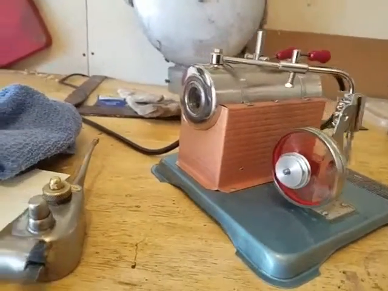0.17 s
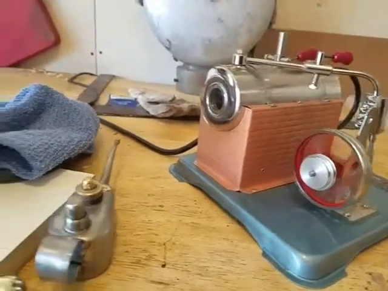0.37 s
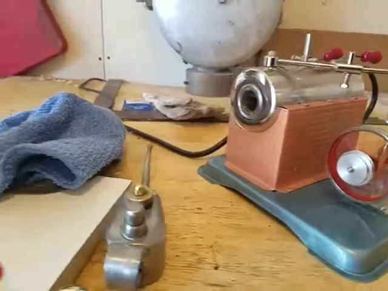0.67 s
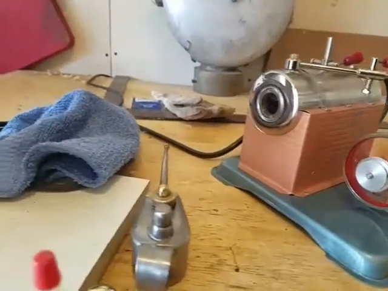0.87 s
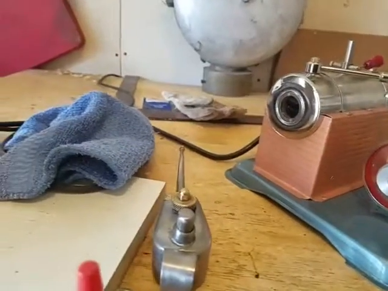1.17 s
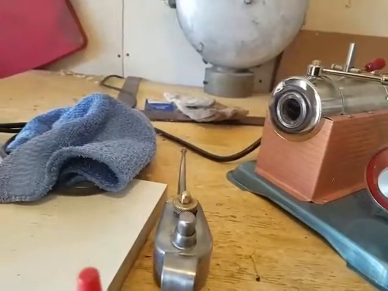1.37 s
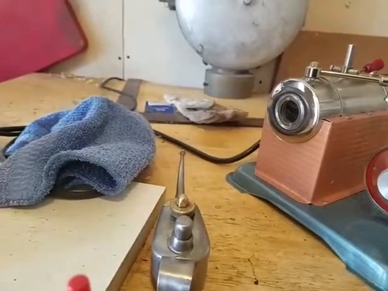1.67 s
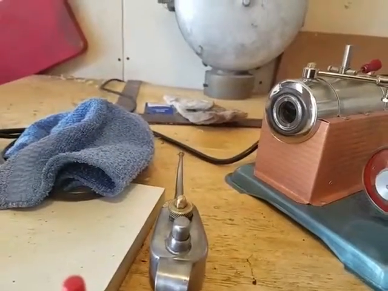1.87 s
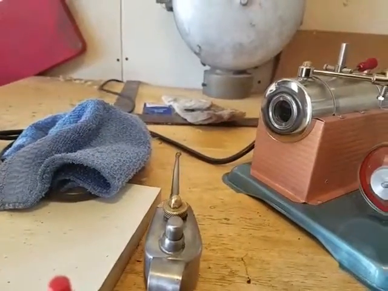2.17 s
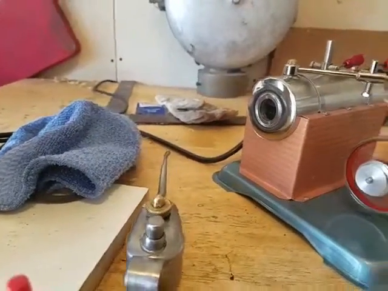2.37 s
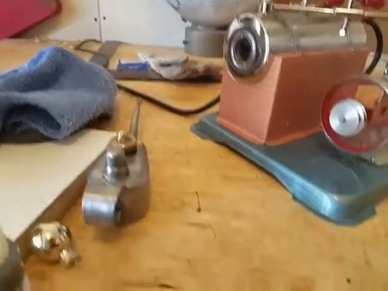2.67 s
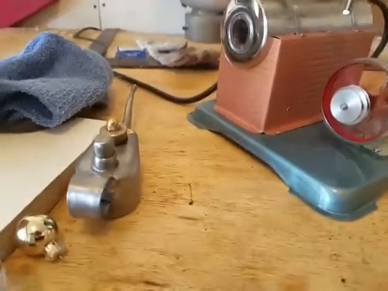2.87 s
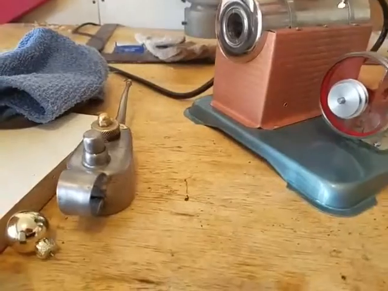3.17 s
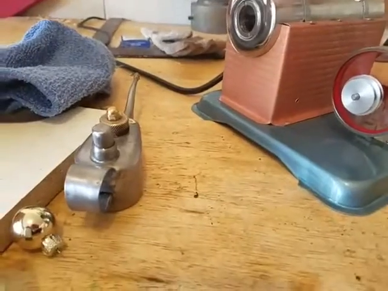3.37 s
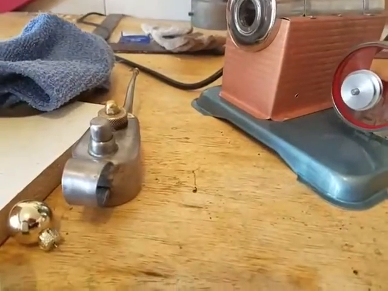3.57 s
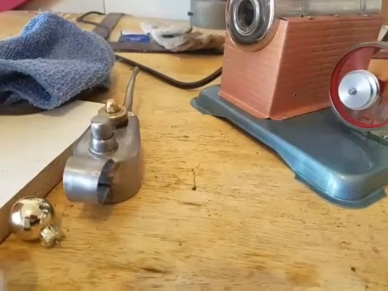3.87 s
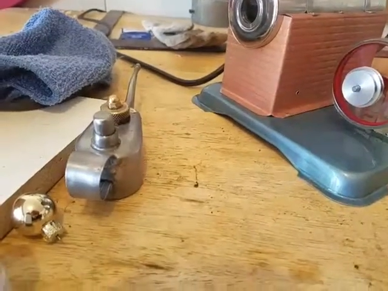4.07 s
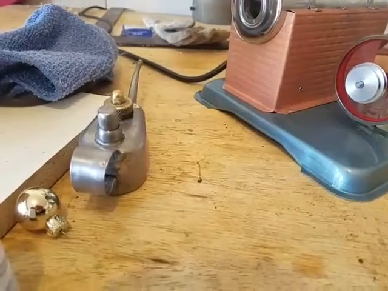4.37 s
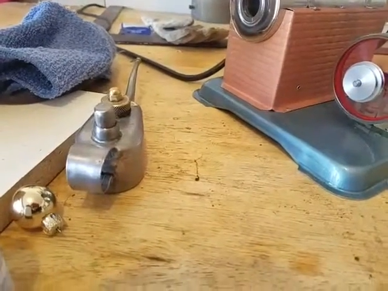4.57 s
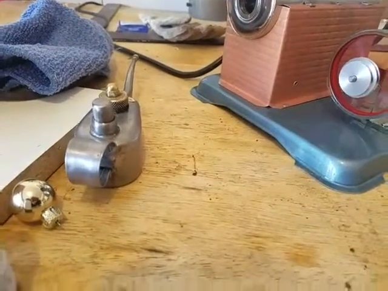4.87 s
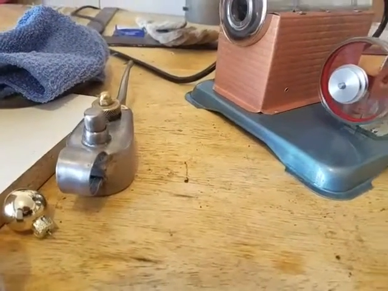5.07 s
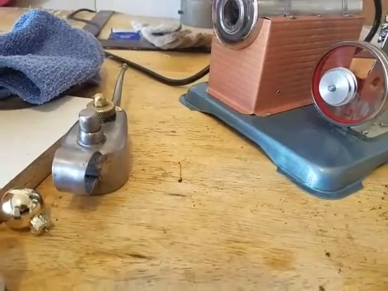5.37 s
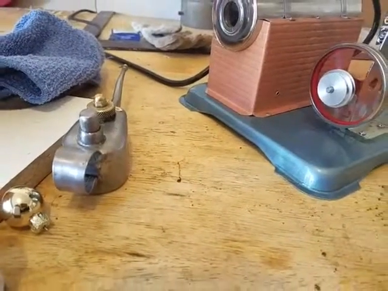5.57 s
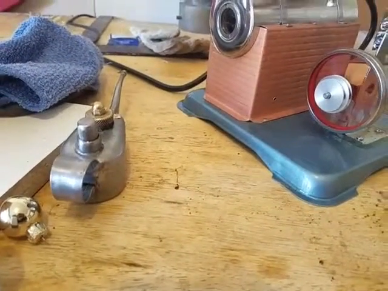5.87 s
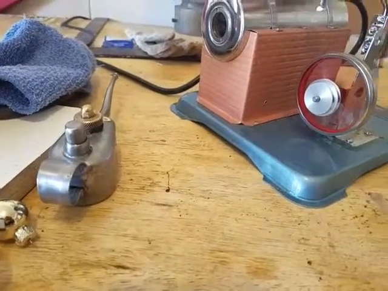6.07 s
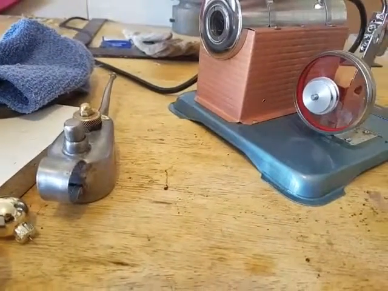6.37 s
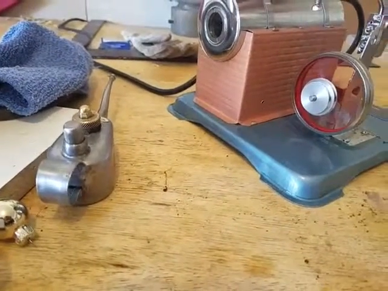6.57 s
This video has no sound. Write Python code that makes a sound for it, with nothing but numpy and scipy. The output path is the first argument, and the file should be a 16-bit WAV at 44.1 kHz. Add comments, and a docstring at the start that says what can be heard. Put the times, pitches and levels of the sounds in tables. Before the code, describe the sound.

From 0 s a toy steam engine is already running on a wooden bench, about fifteen turns a second and almost perfectly steady. Each turn gives a dull tinny linkage knock, a soft chuff with a bright, thin spit of steam, and a little bearing grind, merging into a fast rattling purr. Faint bumps and rubs pass around 2.4-3 s; light hand knocks come from 4.1 to 4.7 s. At about 4.57 s a valve spits open and a piercing whistle chirps upward to roughly 5.6 kHz, holding with slight flutter and hiss, shifting between the sides, while the engine drops back. Near 5.95 s it roughens and leaps higher, breaking around 6.1 s into broad hissing steam with sharp splutters, brief squeals and low buffets, mostly left, until the end at about 6.7 s. Close stereo microphones, a small room's short tail, quiet background noise.

```python
"""Toy steam engine and whistle.

The engine runs at about fifteen turns a second: noise puffs for the exhaust, struck modes for the loose
linkage knocking on the tin base, looped grinding noise for the bearing. A hand opens the boiler whistle, a
roughened sine with an octave, which chirps, sings, overblows and breaks into shaped noise and sharp
spluttering pulses. Faint workshop noise lies beneath. The recorder's gain control pushes the engine back
under the whistle.
"""
import sys
import numpy as np
from scipy import signal
from scipy.fft import rfft, irfft
from scipy.io import wavfile
from scipy.ndimage import uniform_filter1d, map_coordinates

SR = 44100
rng = np.random.default_rng(int(sys.argv[2]) if len(sys.argv) > 2 else 0)


def unload_wav(signal):
    """Save mono or channel-first audio to the path in sys.argv[1] as 16-bit WAV at rate SR, clipped to [-1, 1]."""
    wavfile.write(
        sys.argv[1],
        SR,
        np.round(np.clip(np.atleast_2d(signal).T, -1, 1) * 32767).astype(np.int16),
    )


N = 296352
TIME_S = np.arange(N) / SR

# flywheel speed: start_s, turns_per_s
FLYWHEEL_SPEED = [(0, 14.686), (1.4, 14.718), (2.1, 14.841), (4.5, 14.819)]
# level offsets of the engine's parts; the chuff sinks as the whistle bleeds off pressure:
# start_s, hiss_db, chuff_db, knock_db, base_db
ENGINE_LEVELS = [(0, 0.5, 0.5, 3, 1.5), (.5, 2, 1, 4, 0.5), (.9, 1, 1.5, 0.5, 0.5), (1.25, 2, 1, 1, 0.5),
                 (1.851, 3, 3.5, -1, 0), (2.6, 0, 1, 2, 0.5), (3.2, 3, 2.5, 1, 1.5),
                 (3.5, -0.5, 1.5, -2, 0), (3.9, 1.5, 1.5, -1.5, 1), (3.98, 2.5, 2, 1, 0.5),
                 (4.27, 0.5, 0, -3, -0.5), (4.5, 2, -4, 1, -0.5), (4.8, 2, -7.5, -2, 0),
                 (5.3, -5, -10, -3, 0.5), (6.72, 1, -4, -3, -4)]
# scatter from stroke to stroke: hiss_db, chuff_db, knock_db
STROKE_SCATTER_DB = [1.2, 1, 0.9]
# linkage contacts in every turn: after_stroke_s, strength_db, best_driven_hz
LINKAGE_CONTACTS = [(-0.01196, -4, 199), (-0.00475, 2, 2300), (0.00448, 8, 1480), (0.00909, 4, 640),
                    (0.0113, -2, 835), (0.0176, -6.5, 347), (0.0272, -6, 572), (0.0299, 15.5, 25),
                    (0.0384, -8, 1836), (0.04591, -8.5, 550), (0.0547, -10, 340)]
# modes of bench top, tin base and firebox: mode_hz, level_db, t60_s
BASE_MODES = [(74.6, -46.5, 0.15), (107.8, -45, 0.37), (128.6, -34.5, 0.19), (151.7, -40.5, 0.18),
              (180.2, -39, 0.37), (216, -40, 0.32), (244.4, -46, 0.18), (280.3, -32.5, 0.06),
              (352.1, -40.5, 0.23), (399.2, -44.5, 0.23), (427.2, -39.5, 0.15), (467.5, -37.5, 0.11),
              (507.5, -38, 0.1), (594, -44.5, 0.27), (628.2, -38, 0.12), (675.5, -44.5, 0.13),
              (729.7, -40, 0.22), (752, -45.5, 0.29), (781.7, -31, 0.17), (872.5, -42.5, 0.13),
              (932, -36, 0.03), (1079, -45, 0.15), (1197.3, -37.5, 0.011), (1234.5, -23.5, 0.06),
              (1337.7, -32.5, 0.039), (1426.5, -36.5, 0.044)]
# bearing grind colour, heard through the bench: point_hz, relative_db_per_hz, left_right_db
BEARING_COLOUR = [(197, -6, -8), (412, -3, 0), (540, 4, 14), (740, -11, -19), (910, 0, -11),
                  (1540, 2.5, 27), (1700, -40, 2), (4000, -50, 0)]
# exhaust steam colour: point_hz, relative_db_per_hz, left_right_db
PUFF_COLOUR = [(1750, -7, 10), (2075, -2.5, 3), (2330, -15, -6), (3130, -6, -0.5), (3580, -12.5, 0.5),
               (4470, -11, -0.5), (5270, -12, -1), (6360, -17, 0), (7800, -14, -1), (8800, -11.5, 0),
               (9600, -13.5, -6), (11600, -10.5, -2), (12700, -8.5, 4), (13500, -3, 3), (15360, -1, 0)]
# exhaust hiss peaks, shifting as the microphones move about the engine:
# start_s, upper_hz, upper_db, lower_hz, lower_db
HISS_PEAKS = [(0, 14300, -7, 12600, -12.5), (.5, 13970, -3, 12600, -8), (1, 13660, -2.5, 11930, -13),
              (2.25, 13450, -2.5, 11900, -16), (2.6, 13670, -0.5, 11200, -8.5), (3, 14000, -5, 11390, -8.5),
              (3.4, 14250, 1.5, 11180, -6.5), (3.9, 14300, 0.5, 11320, -6.5), (4.5, 14470, 0.5, 11500, -7)]
# modes of cylinder and steam pipe, ticked as the port opens: mode_hz, level_db, t60_s
PIPE_MODES = [(2026, -39, 0.042), (2125, -45, 0.06), (2850, -39.5, 0.06), (3270, -59, 0.064),
              (4380, -43, 0.086), (4750, -37, 0.044)]
# whistle note, following boiler pressure: start_s, pitch_hz
WHISTLE_NOTE = [(4.635, 5776), (4.649, 5720), (4.861, 5595), (4.893, 5653), (5.101, 5576), (5.129, 5644),
                (5.715, 5533), (5.835, 5603), (5.925, 5552)]
# valve pushed wide, tone overblows and breaks: start_s, pitch_rise_hz, level_change_db, added_roughness_0_1
OVERBLOW = [(5.932, -1.5, 0, 0.01), (5.965, 401, -0.5, 0.58), (6.005, 897, -2, 0.6), (6.025, 996, 2, 0.25),
            (6.08, 984, 1, 0.14), (6.1, 1232, 0, .4), (6.12, 1650, -3, 0.47), (6.135, 1551, -15, 0.73),
            (6.21, 1498, -16, 0.8), (6.32, 1650, -45, 0.62)]
# standing waves at the two microphones: start_s, level_db, left_right_db, left_right_phase_rad
STANDING_WAVES = [(4.58, 8.5, -6, 2.6), (4.592, -1, 4, -3.5), (4.652, 0, 1.0, -3), (4.716, 2, 2, -2.5),
                  (4.748, 0, 5, -3), (4.78, -2, 11.5, -1), (4.792, 4.5, -1, -1.4), (4.88, 3.5, -11, 0.4),
                  (4.9, -0.5, 4.0, -1.5), (4.94, 2.5, 0, -0.6), (5.028, 0.5, 7.5, -1), (5.084, 1, 7, -1.1),
                  (5.124, 1.5, 4, 2), (5.176, -0.5, -0.5, -1.3), (5.264, 1, -2, -0.5),
                  (5.388, 0.5, -2, -1.1), (5.428, -1.5, 6, -1.1), (5.496, 2.5, 1, -1.25),
                  (5.54, 0, 3.5, -1.3), (5.576, 1.0, 0, -1), (5.604, 0.5, 4.5, 1.5),
                  (5.656, 1.5, -7.5, -2.3), (5.72, -1, -3, 0.4), (5.768, 1, 5.0, -0.8),
                  (5.852, 2, -1, -1.8), (5.908, -1.5, 4, 0.5), (5.936, 2.0, 0.5, -2), (5.968, 0.0, 2, -3),
                  (5.972, -3.5, 2, -7), (6.008, 0, -5, -8.5), (6.02, 0.5, 2, -12.5), (6.04, -2, 3, -9.5),
                  (6.06, 0.5, 3, -12), (6.096, 0, 3.5, -12)]
# steam through the valve: start_s, leak_hiss_db, overblown_jet_db, microphone_draught_db
VALVE_STEAM = [(4.545, -43, -76.5, -73), (4.57, -21.5, -82, -43), (4.75, -16, -80, -37.5),
               (5.3, -18, -82, -48.5), (5.9, -16, -61, -41.5), (6.0, -15, -25, -31),
               (6.12, -12.5, -25, -32.5), (6.25, -19, -16, -36), (6.35, -33, -13, -29),
               (6.72, -15.5, -12.5, -32)]
# hiss colour beside the tone: point_hz, relative_db_per_hz, left_right_db
LEAK_COLOUR = [(1730, -18.5, 1.5), (2980, -13, -1), (4420, -12, -0.5), (6700, -10.5, -1), (7450, -8.5, 7),
               (7650, -9.5, -2), (7900, -11, -5), (8350, -4.5, 3), (9000, -11.5, -3), (9600, -15, -6),
               (10600, -11.5, -5), (11400, -7.5, -2), (12100, -9, -5), (13000, -6, -1), (13600, -6, 0.7),
               (14200, -4, 4.0), (15200, 0.0, 8.7), (16200, -1, 4)]
# overblown jet colour: point_hz, relative_db_per_hz, left_right_db
JET_COLOUR = [(1991, -20, 6), (3900, -21.5, 2), (5460, -17, 2.4), (6250, -22, -0.1), (6600, -13, 10),
              (6930, -4, -1), (7660, 0.5, -3.5), (7680, -3, 4), (7800, -9, 3), (8400, -4, 4.2),
              (8600, -12, -2), (9440, -10.5, 6), (9800, -20, 4), (10560, -8.5, -9.1), (11200, -17, -6),
              (11700, -10.5, -5.6), (12500, -12.5, -2.5), (13200, -11.2, -1), (14600, -10, 6),
              (14950, -12, 2), (15500, -1, 9), (15750, -8, 9.8)]
# draught buffeting the microphones: point_hz, relative_db_per_hz, left_right_db
BUFFET_COLOUR = [(44.7, -21, 17), (131, -0.5, 4), (184, -6, 16), (340, -3.5, 3.5), (700, -11, 25),
                 (2000, -21, 5)]
# short bursts at the valve's opening and as the tone breaks: spits, thin squeals and gusts:
# start_s, length_s, level_db, centre_hz, relative_width
STEAM_BURSTS = [(4.558, 0.012, -28.5, 5640, .07), (4.574, 0.033, -20, 5220, 0.092),
                (6.072, 0.027, -23.5, 1682, 0.41), (6.095, 0.018, -19, 252, 0.76),
                (6.104, 0.019, -17.5, 1430, 0.79), (6.12, 0.074, -20.5, 1910, 1.2),
                (6.13, 0.06, -22, 3080, 0.13), (6.135, 0.054, -18, 8550, 0.012),
                (6.222, 0.023, -22, 2070, 0.78), (6.248, 0.031, -21, 9060, .02),
                (6.25, 0.02, -23, 2100, .75), (6.316, 0.066, -20.5, 750, 2.3), (6.39, 0.033, -24, 483, 2.2),
                (6.458, 0.072, -28, 700, 2.9), (6.57, 0.018, -25.5, 249, 1.2)]
# sharp spluttering pulses of the jet, many of them buffets at the left microphone:
# start_s, peak_db, pitch_hz, left_right_db
JET_PULSES = [(6.106, -8.5, 420, -5), (6.117, -11, 1500, 8), (6.169, -11, 2600, 6), (6.227, -15, 2900, 12),
              (6.238, -12, 1800, 3), (6.255, -13, 1300, 11), (6.267, -6, 1700, 9), (6.3, -10, 400, 18),
              (6.318, -13, 484, 18), (6.328, -14, 330, 18), (6.343, -14, 400, 15), (6.351, -12, 600, 15),
              (6.364, -15, 500, 15), (6.373, -11, 350, 19), (6.393, -16, 315, 15), (6.411, -13, 600, 19),
              (6.461, -13, 550, 15), (6.483, -13, 450, 15), (6.499, -11, 1200, 9), (6.577, -15, 281.4, 15)]
# bumps, rubs and a low swell of draught: start_s, length_s, level_db, centre_hz, relative_width
BUMPS_AND_SWELL = [(2.42, 0.11, -42.5, 266.4, 0.65), (2.47, 0.12, -44, 1820, 0.11),
                   (2.53, 0.2, -44, 1620, 0.064), (2.68, 0.3, -50, 1560, 0.078), (2.7, 0.18, -47, 71, 0.43),
                   (4.13, 0.34, -40.5, 420, 0.89), (4.335, 0.038, -47, 365, 0.45),
                   (4.45, 0.042, -40, 882, 0.23), (4.684, 0.016, -31, 1400, 0.68),
                   (4.69, 0.046, -29, 140, 0.57), (5.36, 0.42, -42, 130, 0.23), (6.097, 0.048, -33, 109, 1),
                   (6.445, 0.037, -37, 150, 0.52)]
# knocks of the hand against the engine: start_s, strength_db, best_driven_hz
HAND_KNOCKS = [(4.1875, -16, 900), (4.199, -21, 750), (4.231, -24, 220), (4.326, -21, 800),
               (4.528, -22.5, 850), (4.474, -28, 850), (4.687, -12.5, 240), (4.705, -16, 130)]
# modes rung by those knocks: mode_hz, level_db, t60_s
KNOCK_MODES = [(133, -2, 0.076), (212.2, -5, 0.046), (397, -5, .04), (592, -9, 0.06), (862.5, 1.5, .055),
               (975, -4, .03), (1130, -6, 0.036), (1900, -21, 0.018)]
# workshop background colour: point_hz, relative_db_per_hz, left_right_db
FLOOR_COLOUR = [(25, -36, 0), (60, -15, 2), (110, -3, 0), (164, -6, 2), (260, -2, 4), (400, 7.5, -6),
                (600, 2, 11), (1250, -1, -2), (1990, -4.5, 6), (3140, -6, 2), (6260, -27, 0),
                (10000, -42, 3), (15000, -40, 2)]

FIRST_STROKE_S, TURN_JITTER_S = .047, .00014
CONTACT_SCATTER_DB, CONTACT_SCATTER_S = .7, .00002   # dB scatter is x1.5 away from the knock modes
FRESH_GRIT_DB, BEARING_SWELL_S = -9, .021   # grit that is new in each turn
OPEN_S, ATTACK_S, WHISTLE_DB, SAG_DB_PER_S = 4.567, .025, -1.5, .85   # sag: boiler loses pressure
CHIRP_HZ, CHIRP_S = 1650, .011   # starts this flat, rises as steam replaces the air in the pipe
DRY_ROUGHNESS, WET_ROUGHNESS, DRYING_S = .14, .12, .17   # condensed water at the start is blown out
OCTAVE_DB, OCTAVE_GROWTH_DB, OCTAVE_SAG_DB_PER_S = -31, 23, 6   # growth: at full overblow
OCTAVE_BLUR_HZ, OCTAVE_ROUGHNESS = 90, 1   # smear by the turbulent jet
ROOM_DB, ROOM_T60_S = -14.5, .38
FLOOR_DB = -48.5
CEILING, CUTOFF_HZ = .82, 15650


def turns():
    """One stroke per flywheel turn, each a little different: time_s, hiss_db, chuff_db, knock_db."""
    angle = np.cumsum(in_time(FLYWHEEL_SPEED)[0]) / SR
    first_turn = np.interp(FIRST_STROKE_S, TIME_S, angle)
    times = np.interp(np.arange(first_turn, angle[-1]), angle, TIME_S)
    times = np.append(2 * times[0] - times[1], times)   # already running at the start
    start_s, *levels_db, _ = np.transpose(ENGINE_LEVELS)
    usual = np.column_stack([times] + [np.interp(times, start_s, level) for level in levels_db])
    return (usual + rng.standard_normal(usual.shape) * [TURN_JITTER_S, *STROKE_SCATTER_DB]).T


def linkage(strokes, knock_hz=1250, knock_pan_db=7.0, body_pan_db=-3.0, spread_rad=0.15, level_db=-0.8,
            radiate_hz=68, contact_hz=1500, knock_rad=0.87, rise_s=0.0011, knock_rise_s=0.001327):
    """The same contacts recur every turn, each driving the base modes near its own pitch."""
    times, _, _, knock_db = strokes
    delay_s, strength_db, best_hz = np.transpose(LINKAGE_CONTACTS)
    at = times[:, None] + delay_s
    at = at + CONTACT_SCATTER_S * rng.standard_normal(at.shape)
    out = np.zeros((2, N))
    for k, (hz, mode_db, t60_s) in enumerate(BASE_MODES):
        # 0-1: how far this mode follows the force of the stroke
        knock_share = np.exp(-(np.log2(hz / knock_hz) / 0.1) ** 2)
        scatter_db = CONTACT_SCATTER_DB * (1.5 - .5 * knock_share) * rng.standard_normal(at.shape)
        size = from_db(mode_db + strength_db + knock_share * 1.05 * knock_db[:, None] + scatter_db)
        size = size / (1 + np.log2(hz / best_hz) ** 2)
        swell_s = rise_s + knock_share * knock_rise_s   # the sheet takes a moment to move
        force = clicks(at.ravel() - swell_s, size.ravel())
        resonance = signal.iirpeak(hz, .5 + np.pi * hz * swell_s, fs=SR)
        mode = signal.lfilter(*resonance, ring(force, hz, t60_s))
        # each mode meets the two microphones in its own phase
        lag_s = ((-1) ** k * spread_rad + knock_share * knock_rad) / (4 * np.pi * hz)
        pair = np.array([np.interp(TIME_S + d, TIME_S, mode) for d in (lag_s, -lag_s)])
        out += pair * panned(body_pan_db + knock_share * (knock_pan_db - body_pan_db))
    # oiled contacts are soft; a small base radiates no deep bass
    radiated = signal.butter(3, [radiate_hz, contact_hz], "band", fs=SR, output="sos")
    return from_db(level_db) * signal.sosfilt(radiated, out)


def exhaust(strokes, split_hz=6500, chuff_db=-24.5, hiss_db=-18.5, lead_s=0.0035, sputter_db=0.5):
    """The port opens with a soft chuff in the pipe's resonances, then a thin bright jet of steam."""
    times, stroke_hiss_db, stroke_chuff_db, _ = strokes
    times = times + 0.0011 * rng.standard_normal(len(times))
    below = signal.butter(4, split_hz, fs=SR, output="sos")
    above = signal.butter(4, split_hz, "high", fs=SR, output="sos")
    low = signal.sosfilt(below, noise(PUFF_COLOUR, direct=0.37, lag_ms=0.19))
    high = signal.sosfilt(above, noise(PUFF_COLOUR, direct=0.39, lag_ms=0.196))
    chuff = puffs(times - lead_s, stroke_chuff_db, rise_s=0.00069, fall_s=0.015,
                  echo_s=0.02, echo_db=-8.5, tail_db=-8.5, tail_s=0.041)
    hiss = puffs(times + 0.0005, stroke_hiss_db, rise_s=0.0014, fall_s=0.0036,
                 echo_s=0.021, echo_db=-16.0, tail_db=-20.0, tail_s=0.034)
    steam = from_db(chuff_db) * low * chuff + from_db(hiss_db) * hiss_colour(high) * hiss
    return steam * from_db(sputter_db * drift(780)[0])


def puffs(times, sizes_db, rise_s, fall_s, echo_s, echo_db, tail_db, tail_s):
    """Amplitude envelope of a puff train: burst, wall reflection and room tail, summed as power."""
    t = np.arange(-SR // 50, SR // 5) / SR

    def burst(u, decay_s):
        return np.exp(2 * np.minimum(u / rise_s, -u / decay_s))

    power = burst(t, fall_s)
    power = power + from_db(2 * echo_db) * burst((t - echo_s) / 2, fall_s)   # twice as long
    power = power + from_db(2 * tail_db) * burst(t, tail_s)
    train = signal.fftconvolve(clicks(times, from_db(2 * sizes_db)), power)[SR // 50:][:N]
    return np.sqrt(np.maximum(train, 0))


def hiss_colour(high):
    """Adds the jet's two moving peaks; patches of colour make the puffs unequally bright."""
    upper_hz, upper_db, lower_hz, lower_db = in_time(HISS_PEAKS)
    upper = from_db(upper_db) * gliding_band(upper_hz, 330) * panned(3.1)
    lower = from_db(lower_db) * gliding_band(lower_hz, 430) * panned(-2.5)
    return patchy(high + upper + lower, depth_db=4.0, patch_hz=798, patch_s=.06)


def port_tick(strokes, lead_s=.0035, scatter_db=1.0, scatter_s=.00032):
    """The rocking cylinder ticks against its port face as the port opens, ringing the pipe modes."""
    times, _, chuff_db, _ = strokes
    out = np.zeros((2, N))
    for hz, mode_db, t60_s in PIPE_MODES:
        for side in range(2):   # thin metal rings differently toward each microphone
            sizes = from_db(mode_db + chuff_db + scatter_db * rng.standard_normal(len(times)))
            at = times - lead_s + scatter_s * rng.standard_normal(len(times))
            out[side] += ring(clicks(at, sizes), hz, t60_s)
    return out


def bearing(strokes, level_db=-42, after_s=0.03):
    """Grinds over the same rough spots every turn, swelling mid-turn, sagging before the next puff."""
    times, _, _, knock_db = strokes
    t = np.arange(-SR // 16, SR // 16) / SR
    swell = np.exp(-.5 * (t / BEARING_SWELL_S) ** 2)
    grit = noise(BEARING_COLOUR, direct=0.85, lag_ms=0.054)
    train = clicks(times + after_s, from_db(0.082 * knock_db))
    one_turn = rms_one(grit[:, :len(t)]) * swell
    repeated = signal.fftconvolve(train[None], one_turn, axes=1)[:, len(t) // 2:][:, :N]
    fresh = grit * signal.fftconvolve(train, swell, "same")
    return from_db(level_db) * (repeated + from_db(FRESH_GRIT_DB) * fresh)


def blowing():
    """Whistle pitch_hz, strength and roughness: a rising chirp, a held note, then the overblow."""
    age_s = np.maximum(TIME_S - OPEN_S, 0)
    rise_hz, change_db, added_rough = in_time(OVERBLOW)
    hz = in_time(WHISTLE_NOTE)[0] - CHIRP_HZ * np.exp(-age_s / CHIRP_S) + rise_hz
    strength = from_db(WHISTLE_DB - SAG_DB_PER_S * age_s + change_db)
    strength = strength * np.minimum(age_s / ATTACK_S, 1) ** 2 * (TIME_S < OVERBLOW[-1][0])
    rough = DRY_ROUGHNESS + WET_ROUGHNESS * np.exp(-age_s / DRYING_S) + added_rough
    return hz, strength, np.clip(rough, 0, 1)


def whistle(flutter_hz=35, skirt_hz=260, skirt_db=-15, wander_hz=12):
    """Pipe tone and octave; droplets make it flutter, standing waves split it between microphones."""
    hz, strength, rough = blowing()
    standing_db, pan_db, apart_rad = in_time(STANDING_WAVES)
    phase = 2 * np.pi * np.cumsum(hz + wander_hz * drift(32.6)[0]) / SR
    flutter = complex_drift(flutter_hz) + from_db(skirt_db) * complex_drift(skirt_hz)
    wave = (np.sqrt(1 - rough ** 2) + rough * rms_one(flutter)) * np.exp(1j * phase)
    split = np.exp(1j * apart_rad * np.array([[.5], [-.5]]))
    tone = from_db(standing_db) * panned(pan_db) * wave * split
    rise_hz, age_s = in_time(OVERBLOW)[0], np.maximum(TIME_S - OPEN_S, 0)
    growth_db = OCTAVE_GROWTH_DB * np.sqrt(np.abs(rise_hz) / rise_hz.max())
    octave_db = OCTAVE_DB - OCTAVE_SAG_DB_PER_S * age_s + growth_db
    smear = rms_one(1 + OCTAVE_ROUGHNESS * complex_drift(OCTAVE_BLUR_HZ))
    octave = from_db(octave_db) * wave * wave * smear   # squaring doubles the pitch
    return np.sqrt(2) * strength * (tone + octave).real


def note_skirt(level_db=-35, half_width_hz=420):
    """Faint noise in a narrow band that follows the note."""
    hz, strength, _ = blowing()
    return from_db(level_db) * strength * gliding_band(hz, half_width_hz)


def valve_steam(flicker_db=1.0):
    """Hiss at the whistle's mouth, the broad jet left when the tone breaks, and its lumpy draught."""
    leak_db, jet_db, draught_db = in_time(VALVE_STEAM)
    leak = noise(LEAK_COLOUR, direct=0.089, lag_ms=0.094)
    leak = patchy(leak, depth_db=4.0, patch_hz=260.7, patch_s=.22)
    jet = noise(JET_COLOUR, direct=0.36, lag_ms=0.058)
    jet = patchy(jet, depth_db=3.0, patch_hz=259, patch_s=.09)
    steam = from_db(leak_db) * leak + from_db(jet_db) * jet
    draught = from_db(draught_db + 6.0 * drift(44)) * noise(BUFFET_COLOUR, direct=0.33, lag_ms=0.046)
    return steam * from_db(flicker_db * drift(35)) + draught


def jet_pulses(cycles=0.59, crack_db=-8, crack_s=0.00077, lowest_hz=130):
    """Sharp splutters: a tiny noise crack and a sine that dies within a few cycles."""
    out, age_s = np.zeros((2, N)), np.arange(SR // 40) / SR
    for start_s, peak_db, hz, pan_db in JET_PULSES:
        thump = np.sin(2 * np.pi * hz * age_s) * np.exp(-age_s * hz / cycles)
        dull_noise = signal.lfilter([.5], [1, -.7], rng.standard_normal(len(age_s)))
        crack = from_db(crack_db) * np.exp(-age_s / crack_s) * dull_noise
        a = int(start_s * SR)
        out[:, a:a + len(age_s)] += from_db(peak_db) * (thump + crack) * panned(pan_db)
    return signal.sosfilt(signal.butter(2, lowest_hz, "high", fs=SR, output="sos"), out + 1e-18)


def bursts(rows, grain_db, direct, pan_db, skew=0.7):
    """Short swells of grainy noise, rising faster than they fall, each in its own band."""
    out = np.zeros((2, N))
    shared = np.sqrt(direct) * rng.standard_normal(N)
    source = shared + np.sqrt(1 - direct) * rng.standard_normal((2, N))
    source = source * from_db(grain_db * drift(380)[0])
    for start_s, length_s, level_db, hz, width in rows:
        a, b = int(start_s * SR), min(int((start_s + length_s + .05) * SR), N)
        progress = np.clip((TIME_S[a:b] - start_s) / length_s, 0, 1)
        swell = np.sqrt(np.sin(np.pi * progress ** skew).clip(0))
        edges_hz = [hz / (1 + width), min(hz * (1 + width), SR / 3)]
        band = signal.butter(1, edges_hz, "band", fs=SR, output="sos")
        sound = signal.sosfilt(np.vstack([band, band]), source[:, a:b] * swell)
        out[:, a:b] += from_db(level_db) * rms_one(sound) * np.sqrt(np.mean(swell ** 2))
    return out * panned(pan_db)


def hand_knocks(level_db=-3):
    """Each knock of the hand rings most the modes near its own pitch."""
    start_s, knock_db, best_hz = np.transpose(HAND_KNOCKS)
    out = np.zeros(N)
    for k, (hz, mode_db, t60_s) in enumerate(KNOCK_MODES):
        sizes = from_db(knock_db + mode_db) / (1 + np.log2(hz / best_hz) ** 2)
        out += (-1) ** k * ring(clicks(start_s, sizes), hz, t60_s)
    return from_db(level_db) * out * panned(-1.0)


def bench(x, left_s=(.0013, .0037), right_s=(.0017, .0043), echo_db=-33.0):
    """Bench top and back wall return the steam's sound within milliseconds and ripple its colour."""
    echoes = [sum(np.interp(TIME_S - d, TIME_S, side, left=0) for d in delays)
              for side, delays in zip(x, (left_s, right_s))]
    return (x + from_db(echo_db) * np.array(echoes)) / np.sqrt(1 + 2 * from_db(2 * echo_db))


def workshop(x):
    """Adds the room's diffuse tail: decaying noise, different at each microphone."""
    age_s = np.arange(SR // 2) / SR
    tail = rng.standard_normal((2, len(age_s))) * from_db(-60 * age_s / ROOM_T60_S)
    tail = tail / np.sqrt(np.sum(tail ** 2, axis=1, keepdims=True))
    return x + from_db(ROOM_DB) * signal.fftconvolve(x, tail, axes=1)[:, :N]


def workshop_floor():
    """Steady coloured noise of the quiet workshop."""
    return from_db(FLOOR_DB) * noise(FLOOR_COLOUR, direct=0.97, lag_ms=0.034)


def from_db(db):
    """Decibels to gain."""
    return 10 ** (np.asarray(db) / 20)


def rms_one(x):
    """Scale to unit power."""
    return x / np.sqrt(np.mean(np.abs(x) ** 2) + 1e-20)


def in_time(rows):
    """Each column of a curve at every sample."""
    start_s, *columns = np.transpose(rows)
    return [np.interp(TIME_S, start_s, column) for column in columns]


def panned(pan_db):
    """Left and right gains of equal total power."""
    pair = from_db(np.array([[.5], [-.5]]) * pan_db)
    return pair / np.sqrt(np.mean(pair ** 2, axis=0))


def drift(rate_hz):
    """Low-passed noise of spread 1, different in each channel."""
    lowpass = signal.butter(2, rate_hz, fs=SR, output="sos")
    slow = signal.sosfilt(lowpass, rng.standard_normal((2, N + SR)))
    return rms_one(slow[:, SR:])   # drops the filter's start


def complex_drift(rate_hz):
    """Two independent drifts as real and imaginary parts: random amplitude and phase."""
    return drift(rate_hz) + 1j * drift(rate_hz)


def noise(colour, direct, lag_ms):
    """Coloured stereo noise; its direct share reaches the left microphone later, the rest is diffuse."""
    hz = np.fft.rfftfreq(N, 1 / SR) + 1   # +1 keeps the logarithm finite
    point_hz, level_db, pan_db = np.transpose(colour)
    shape = from_db(np.interp(np.log(hz), np.log(point_hz), level_db))
    shape = shape / np.sqrt(1 + (.8 * point_hz[0] / hz) ** 8)   # rolls off below the first point
    white = rfft(rng.standard_normal((3, N)))
    lag = np.exp(-2j * np.pi * hz * np.array([[lag_ms / 1000], [0]]))
    both = np.sqrt(direct) * white[2] * lag + np.sqrt(1 - direct) * white[:2]
    return rms_one(irfft(both * shape * panned(np.interp(hz, point_hz, pan_db)), N))


def gliding_band(centre_hz, half_width_hz):
    """Stereo noise in a resonance whose centre moves."""
    carrier = np.exp(2j * np.pi * np.cumsum(centre_hz) / SR)
    return rms_one((complex_drift(half_width_hz) * carrier).real)


def patchy(x, depth_db, patch_hz, patch_s):
    """The colour of a noise flickers in patches of a given width and length; unit power."""
    hz, s, spectra = signal.stft(x, SR, nperseg=512)
    where = np.meshgrid(hz / patch_hz, s / patch_s, indexing="ij")
    grids = rng.standard_normal((2, 200, 200))
    chance = np.array([map_coordinates(grid, where, order=1, mode="wrap") for grid in grids])
    return rms_one(signal.istft(spectra * from_db(depth_db * chance), SR)[1][:, :N])


def clicks(times, heights):
    """One impulse at each time."""
    out = np.zeros(N)
    inside = (times >= 0) & (times < (N - 1) / SR)
    out[(times[inside] * SR).astype(int)] = heights[inside]
    return out


def ring(force, hz, t60_s):
    """Two-pole resonator: a unit click starts a decaying sine of height 1."""
    r, w = from_db(-60 / (t60_s * SR)), 2 * np.pi * hz / SR
    return signal.lfilter([0, np.sin(w)], [1, -2 * r * np.cos(w), r * r], force + 1e-18)


def scene():
    """Engine, whistle and the hand at the valve, over the quiet of the workshop."""
    strokes, base_db = turns(), in_time(ENGINE_LEVELS)[-1]
    engine = from_db(base_db) * (linkage(strokes) + bearing(strokes))
    engine = engine + bench(exhaust(strokes)) + port_tick(strokes)
    blown = workshop(whistle()) + note_skirt() + bench(valve_steam())
    splutter = bursts(STEAM_BURSTS, grain_db=3.5, direct=0.044, pan_db=14.5) + jet_pulses()
    bumps = bursts(BUMPS_AND_SWELL, grain_db=0.5, direct=0.88, pan_db=-1.0) + hand_knocks()
    return engine + blown + splutter + bumps + workshop_floor()


def record(dry, threshold_db=-7.1, release_db_per_s=1.5):
    """Gain control ducks fast and recovers slowly; peaks are rounded and the top is cut."""
    power = uniform_filter1d(np.mean(dry ** 2, axis=0), size=SR // 70)
    level_db = 10 * np.log10(np.maximum(power, 1e-12))
    released_db = release_db_per_s * TIME_S
    held_db = np.maximum.accumulate(level_db + released_db) - released_db
    ducked = dry * from_db(-np.maximum(held_db - threshold_db, 0))
    rounded = ducked / (1 + (ducked / CEILING) ** 8) ** (1 / 8)
    return signal.sosfilt(signal.ellip(10, .2, 80, CUTOFF_HZ, fs=SR, output="sos"), rounded)


dry = scene()
out = record(dry)
unload_wav(out)
```